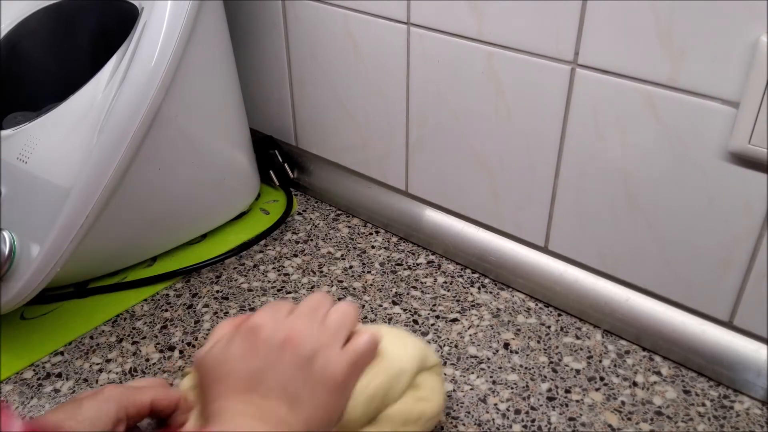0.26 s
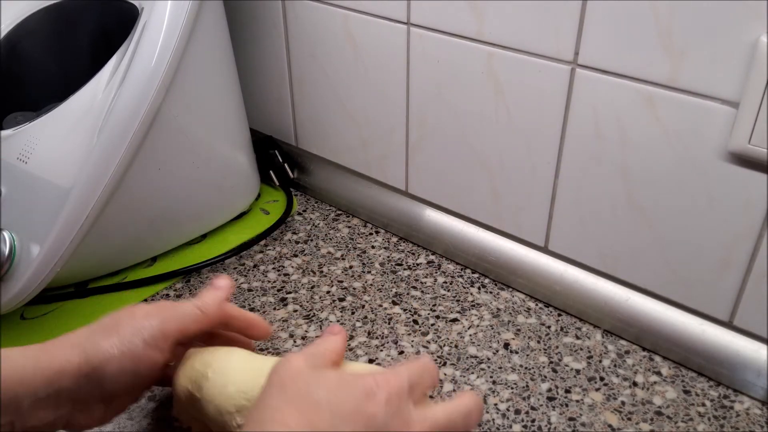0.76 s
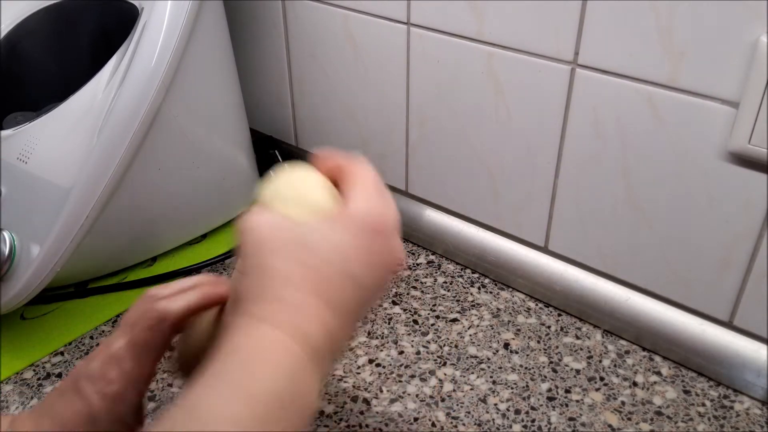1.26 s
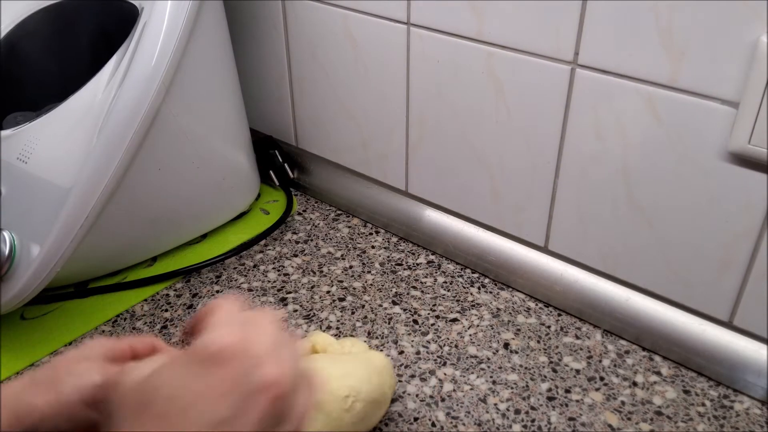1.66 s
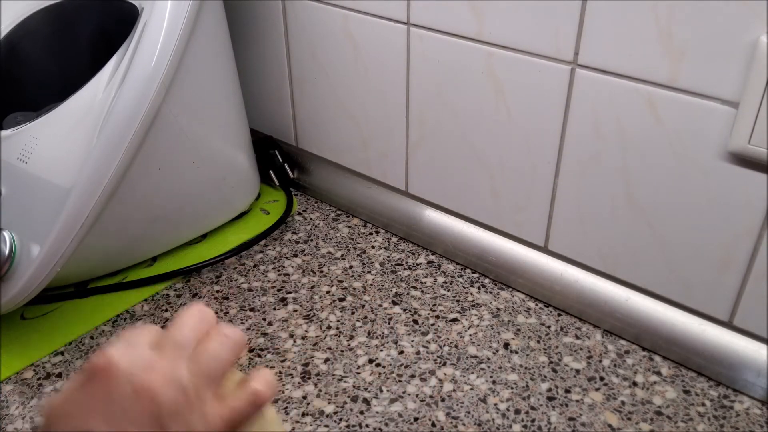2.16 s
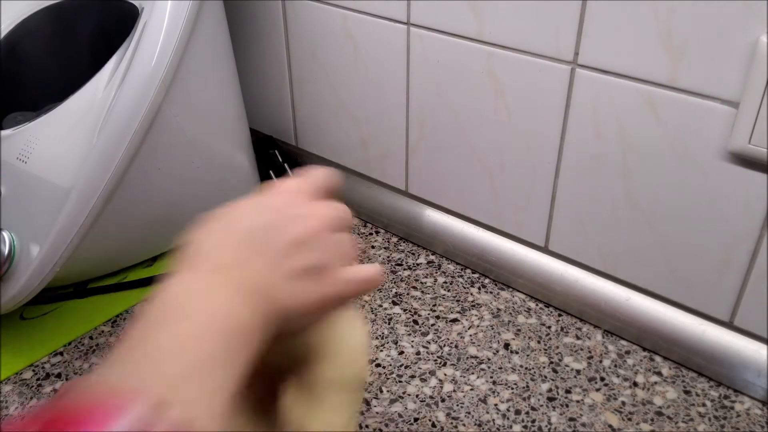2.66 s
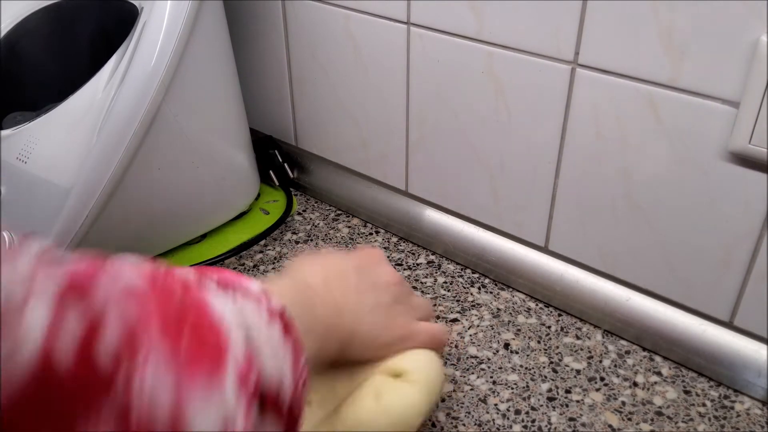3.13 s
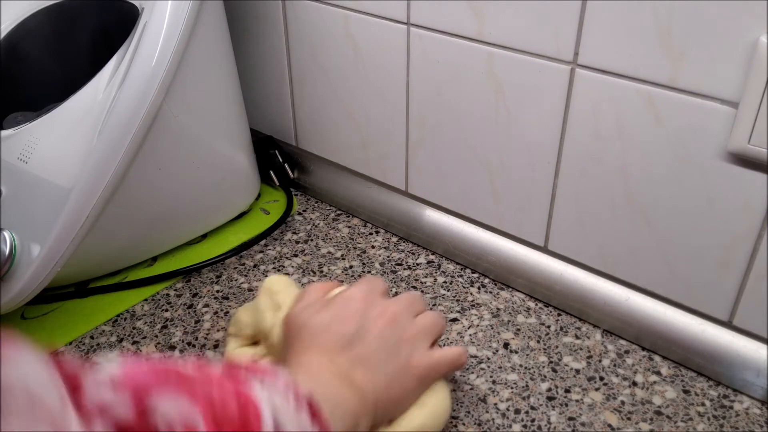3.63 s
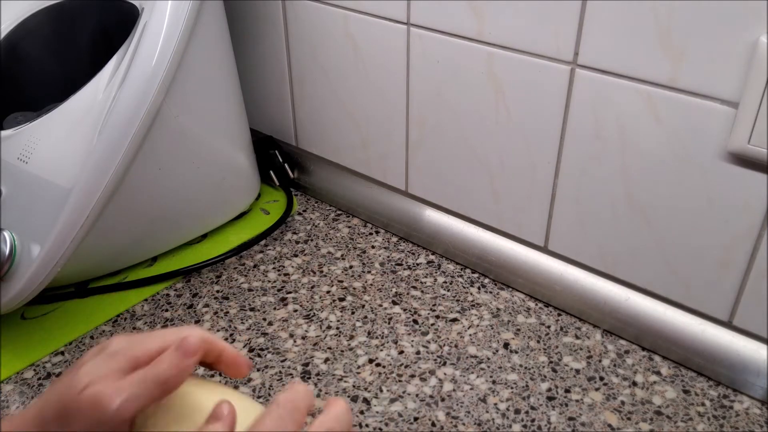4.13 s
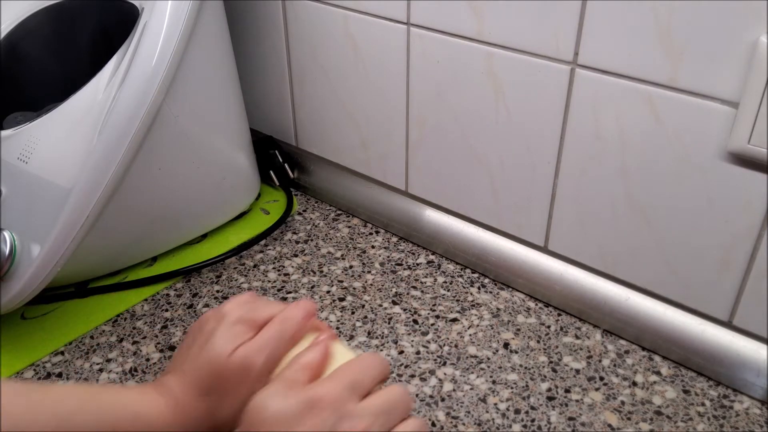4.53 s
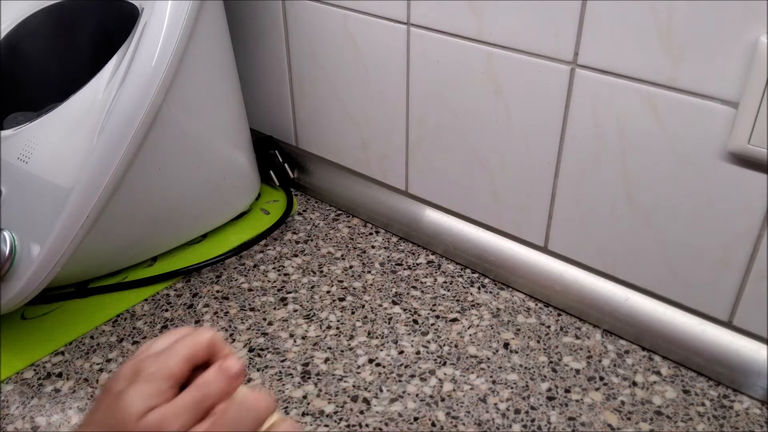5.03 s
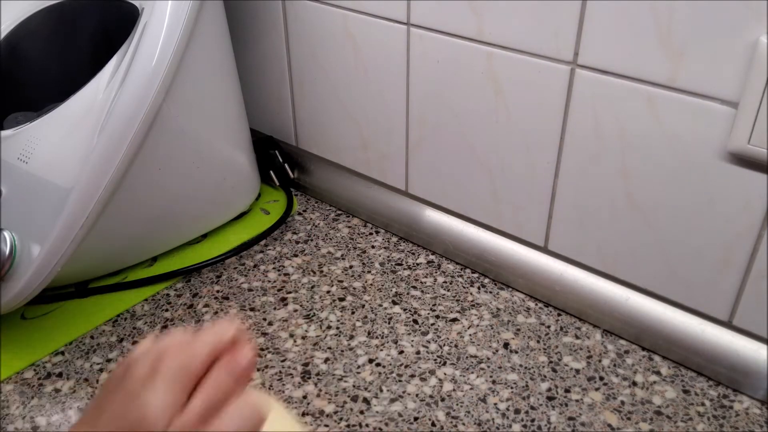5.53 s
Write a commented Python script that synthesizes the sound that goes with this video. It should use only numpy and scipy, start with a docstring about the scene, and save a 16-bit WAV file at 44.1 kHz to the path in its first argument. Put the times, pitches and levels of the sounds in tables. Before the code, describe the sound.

Hands knead a lump of soft dough on a hollow kitchen countertop, making dull, uneven thuds with a faint hiss of rubbing skin. About a second and a half in, the dough is slammed down with a loud slap and a low boom. Softer pushes follow, with small sticky ticks and a lighter smack at the end. The microphone is close, and the tiled room rings briefly.

```python
"""A hollow kitchen worktop booms on its low modes as hands knead soft dough on it.
Each push is a force pulse that excites the modes; dragging dough keeps them and an air pocket ringing.
Once the lump is slammed down with a slap and a crack. Friction of skin and dough adds a soft hiss.
The tiled room rings briefly over a faint room tone, and a pair of small microphones listens close by."""
import sys
import numpy as np
from scipy import signal
from scipy.fft import rfft, irfft, next_fast_len
from scipy.io import wavfile
from scipy.ndimage import uniform_filter1d

SR = 44100
rng = np.random.default_rng(int(sys.argv[2]) if len(sys.argv) > 2 else 0)


def bounce(signal):
    """Save signal as a 16-bit WAV file at the path given by the first command-line argument."""
    frames = np.transpose(np.atleast_2d(signal))
    limited = np.clip(frames, -1, 1)
    pcm = np.round(limited * 32767).astype(np.int16)
    wavfile.write(sys.argv[1], SR, pcm)


N = 255339

# worktop modes in three groups: (f/Hz, relative level/dB, free t60/s, build-up/ms)
DEEP_MODES = [(72.45, 2.5, 0.2, 12.8), (45.5, -10, 0.49, 40.2)]
PANEL_MODES = [(132.35, 5, 0.21, 2.66), (111.3, -10.5, 0.29, 2.36), (173, -17, 0.36, 2.3)]
UPPER_MODES = [(294.6, -8, 0.37, 3.1), (370.6, 3.5, 0.12, 2.1), (429, 9.5, 0.07, 2.6),
               (588, -0.5, 0.12, 1.8), (639, -11, 0.42, 4.1), (717, 6, 0.085, 0.6), (860, 6.5, 0.074, 4.3),
               (236.7, -8.5, 0.093, 1.8), (343, -13.5, 0.468, 2.54), (501.3, -13.5, 0.25, 7.6),
               (956, -12, 0.323, 1.6)]
# the deep modes lead by a quarter cycle
MODE_GROUPS = (DEEP_MODES, np.cos), (PANEL_MODES, np.sin), (UPPER_MODES, np.sin)
# pushes on the worktop: (t/s, level/dB, panel offset/dB, upper offset/dB, share of the free t60)
PUSH_PULSES = [(.018, -46, 2.5, -37, 0.74), (.088, -39, -1, -22, 0.74), (0.182, -53, -9, -25, .6),
               (0.218, -48, -0.5, -6.5, 0.28), (.264, -51, 14, -33, .34), (0.408, -54, 6.5, -22, 0.97),
               (0.48, -41.5, 0, -19, 1), (0.531, -32.5, -8.5, -20.5, 0.54), (0.574, -49, -7, -6, 0.4),
               (0.681, -49.5, 5.5, -36, .65), (0.86, -64, 0, -22, 0.42), (0.991, -37, -3, -21, 0.49),
               (1.16, -43.5, -3, -21, 1), (1.2, -38.5, -6.5, -23, 0.56), (1.5421, -33, 3, -1.5, .3),
               (1.547, -5.5, -8.5, -20.5, 0.75), (1.659, -31.5, -3, -7.5, 0.64),
               (1.7, -40, 2.5, -24.5, 0.74), (1.881, -31, 7, -2.5, 0.42), (1.907, -27, 6, -21, 0.63),
               (2.014, -46.5, 7.5, -38, 0.93), (2.24, -42, -12.5, -29, 0.56), (2.299, -50.5, -3, -9, 0.46),
               (2.389, -62.5, 10, -0.5, .97), (2.6, -46, -6.5, -34, 1), (2.696, -46, 1, -22, 1),
               (2.857, -33.5, -12, -27, 0.65), (2.903, -29, -26, -42, 0.47), (2.989, -60, -10, -27, 0.57),
               (3.102, -44, 6, -12, 0.92), (3.134, -39.5, 0, -17, 0.92), (3.173, -38, -7, -38, 0.48),
               (3.389, -47.5, -7, 5.5, 0.24), (3.491, -36.5, -8.5, -22, 0.95), (3.592, -42, 5.5, -44, 0.37),
               (3.619, -40, 0, -28, 0.69), (3.658, -39, -18, -39, 0.59), (3.714, -30, -7.5, -32, .58),
               (3.821, -47, 0, -15, 0.58), (4.249, -46.5, -19, -54, 1), (4.646, -40, -6, -45, 1),
               (4.82, -53, 7.5, -10, 0.6), (4.924, -54, -6, -22, 1), (5.052, -25, -9.5, -62, 0.77),
               (5.157, -47, 5.5, 0.5, 1), (5.196, -43, -2, -10, 0.53), (5.239, -40, 3.5, -17, 0.83),
               (5.267, -36, -5.5, -33, 0.81), (5.463, -40.5, 10, -13, 0.97), (5.571, -40, -5, -16, 0.47),
               (5.689, -22, -27, -46, 0.82), (5.731, -37, -10, -15.5, 0.45)]
CONTACT_MS, HARDEN_MS_PER_DB = 2.11, 0.1344  # contact time at 0 dB; softer pushes last longer


def pushes():
    """Impact excitation: a smooth force pulse rings the worktop's modes, which the resting hand damps."""
    out = np.zeros((2, N))
    contact_shares = 1, 1, .3  # the upper modes feel only the first contact
    for start, db, panel_db, upper_db, t60_share in PUSH_PULSES:
        contact_ms = CONTACT_MS - HARDEN_MS_PER_DB * db
        for (modes, wave), offset_db, share in zip(MODE_GROUPS, (0, panel_db, upper_db), contact_shares):
            pulse = np.hanning(max(round(share * contact_ms * SR / 1000), 3) + 2)
            response = modal_response(modes, t60_share, place=0.233, wave=wave)
            add(out, start, gain_of(db + offset_db) * signal.oaconvolve(response, pulse / pulse.sum()))
    return out


def modal_response(modes, t60_share, place, wave):
    """Modal superposition: damped sinusoids, weighted by mode shape at a place (0-1) along the board."""
    t = np.arange(SR // 3) / SR
    response = np.zeros_like(t)
    for k, (hz, db, t60, build_ms) in enumerate(modes):
        envelope = gain_of(db - 60 * t / (t60 * t60_share)) * (1 - np.exp(-1000 * t / build_ms))
        response += np.cos(np.pi * k * place) * envelope * wave(2 * np.pi * hz * t)
    return response


# steady kneading pressure: (t/s, level/dB)
KNEAD_PRESSURE = [(0.0, -56.5), (0.82, -70), (1.14, -60), (1.47, -86), (1.63, -43), (1.77, -54.5),
                  (2.23, -76), (2.55, -67.5), (2.85, -66.5), (3.45, -61.5), (3.69, -50), (3.85, -66),
                  (4.24, -76), (4.69, -63.5), (4.81, -59.5), (5.14, -51.5), (5.4, -64), (5.79, -63)]
# dough dragging on the board: (t/s, duration/s, upper-mode level/dB, air-pocket level/dB)
DOUGH_DRAGS = [(0.05, 0.071, -72, -67), (0.208, .05, -69, -64), (0.428, .18, -67, -63),
               (0.806, 0.062, -75, -71.5), (1.338, .1, -78, -78), (1.559, 0.13, -49.5, -47),
               (1.885, 0.1, -51, -49), (2.356, 0.093, -74.5, -66), (2.577, 0.22, -72, -73),
               (2.846, 0.058, -70, -63), (3.083, 0.14, -68, -60.5), (3.235, 0.12, -75.5, -68.5),
               (3.774, 0.39, -73.5, -72), (4.44, 0.14, -70.5, -74.5), (4.782, .14, -71.5, -73),
               (5.193, 0.1, -62.5, -69.5), (5.444, 0.19, -63.5, -68)]
KNEAD_DB, SLIP_DB, STEREO_SPREAD = (-6, -6.5, -25), (-25, -30.5, -39), (.25, .1, .7)  # deep, panel, upper
SLIP_T60_S = 0.34  # after each push the dough keeps slipping for a while


def kneading():
    """Stick-slip excitation: dough moves in small jerks that drive the worktop and the air pocket."""
    out, blows, t = np.zeros((2, N)), np.zeros(N), np.arange(N) / SR
    for start, db, *_ in PUSH_PULSES:
        add(blows, start, gain_of([db]))
    slipping = signal.lfilter([1], [1, -gain_of(-60 / (SLIP_T60_S * SR))], blows)
    pressure = gain_of(curves(KNEAD_PRESSURE)[0])
    upper_drag, pocket_drag = sum(gain_of(levels)[:, None] * stroke(t - start, duration)
                                  for start, duration, *levels in DOUGH_DRAGS)
    drives = zip(MODE_GROUPS, KNEAD_DB, SLIP_DB, STEREO_SPREAD, (0, 0, upper_drag))
    for (modes, wave), knead_db, slip_db, spread, drag in drives:
        response = modal_response(modes, t60_share=0.33, place=0.89, wave=wave)
        mid, side = jerks(per_second=300)
        grains = unit_rms(np.array([mid + spread * side, mid - spread * side]))
        force = gain_of(knead_db) * pressure + gain_of(slip_db) * slipping + drag
        out += resonate(force * grains, response)
    return out + squishes(pocket_drag)


# air pocket under the palm: (f/Hz, relative level/dB, t60/s, build-up/ms)
POCKET_MODES = [(397.3, 1, 0.082, 2.6), (434.6, -4.5, 0.06, 2.6)]


def squishes(drag):
    """Cavity resonance: the air pocket under the palm rings softly while the dough drags."""
    response = modal_response(POCKET_MODES, t60_share=1, place=0, wave=np.sin)
    mid, side = jerks(per_second=250)
    grains = unit_rms(np.array([mid + .6 * side, mid - 0.67 * side]))
    return resonate(drag * grains, response)


# slaps and sticky ticks of skin on dough: (t/s, level/dB, centre f/Hz, roll-off/(dB per octave), t60/s)
SLAP_BURSTS = [(.2937, -62, 8000, 19, .022), (0.386, -59, 7900, 25, .047), (.779, -47, 12600, 16, 0.0075),
               (.986, -64, 990, 22, 0.12), (1.1862, -62.5, 1920, 9, 0.06), (1.5445, -31, 900, 8.5, .03),
               (1.5478, -20, 2600, 3, 0.03), (1.8779, -51, 960, .5, .042), (1.8839, -46, 940, 1, 0.06),
               (1.9109, -51, 925, 5.5, 0.13), (2.011, -52, 1490, 5.5, 0.05), (2.486, -67, 1570, 19, 0.034),
               (2.8593, -55.5, 1120, 7, 0.046), (3.039, -62.5, 1970, 15, 0.021),
               (3.1811, -36, 6600, 11, 0.033), (3.3891, -43, 2780, 3, 0.043),
               (3.5912, -59.5, 950, 9, 0.035), (3.7614, -52.5, 865, 9, 0.01), (3.831, -54, 8480, -1, 0.042),
               (4.799, -60, 1690, 5.5, 0.14), (5.0532, -60, 2070, 6, .03), (5.1258, -56, 1030, 18, .043),
               (5.1503, -41.5, 920, 19.5, 0.031), (5.467, -57, 1490, 25, .038),
               (5.7683, -33.5, 2060, 6, 0.03)]
SLAP_RISE_MS = 0.85


def slaps():
    """Impact noise: a burst shaped by one broad resonance grows and decays exponentially."""
    out, hz = np.zeros((2, N)), np.fft.rfftfreq(4000, 1 / SR) + 30
    lead_s = .01
    t = np.arange(4000) / SR - lead_s
    for start, db, centre_hz, rolloff_db, t60 in SLAP_BURSTS:
        rise = np.exp(1000 * np.minimum(t, 0) / SLAP_RISE_MS)
        envelope = np.where(t < 0, rise, gain_of(-60 * t / t60))
        colour_db = -rolloff_db * abs(np.log2(hz / centre_hz))
        add(out, start - lead_s, gain_of(db) * envelope * burst(colour_db, pan_db=1.5))
    return out


# quick brushes of skin on dough, and the sharp crack of the lump slammed down:
# (t/s, duration/s, level/dB, lower f/Hz, upper f/Hz)
BRUSHES_AND_CRACK = [(.01, 0.11, -64.5, 1230, 15000), (0.381, 0.044, -62.5, 6030, 15100),
                     (0.457, .15, -61.5, 1740, 15100), (0.814, 0.069, -73, 503, 870),
                     (0.984, .13, -71, 3000, 15000), (1.144, .095, -64.5, 2900, 15000),
                     (1.548, 0.0087, -28, 2000, 4200), (1.877, 0.049, -39, 172, 220),
                     (1.943, 0.14, -60, 1490, 12000), (2.226, 0.1, -60, 8200, 14800),
                     (2.586, 0.18, -59, 1100, 14600), (2.72, .11, -63.5, 1100, 14800),
                     (2.859, 0.066, -59, 8000, 15000), (3.136, 0.15, -58, 1760, 8850),
                     (3.54, 0.24, -64.5, 3280, 15000), (3.796, 0.081, -62, 2480, 15000),
                     (3.949, .2, -72.5, 1400, 1990), (4.211, 0.13, -69, 2440, 15100),
                     (4.422, 0.2, -51.5, 4470, 14900), (4.442, 0.17, -68.5, 700, 2490),
                     (4.621, 0.15, -63.5, 3970, 15100), (4.775, 0.097, -59.5, 1990, 15000),
                     (5.119, 0.15, -64, 700, 1500), (5.125, .14, -59.5, 2920, 15000),
                     (5.244, 0.047, -61, 3000, 15000), (5.392, 0.062, -60.5, 1000, 15000),
                     (5.45, 0.12, -65, 500, 2530), (5.538, 0.067, -69, 1000, 15000),
                     (5.503, .051, -59.5, 3000, 14800), (5.665, 0.16, -51, 4600, 14800)]


def brushes_and_crack():
    """Band-limited noise: stick-slip hiss of brushing skin, and one very short burst for the slam."""
    size = 12000
    out, t, hz = np.zeros((2, N)), np.arange(size) / SR, np.fft.rfftfreq(size, 1 / SR) + 30
    for start, duration, db, low_hz, high_hz in BRUSHES_AND_CRACK:
        flicker_db = 1.5 * unit_rms(uniform_filter1d(rng.standard_normal(size), size=150))
        octaves_outside = np.maximum(np.log2(low_hz / hz), 0) + np.maximum(np.log2(hz / high_hz), 0)
        band = burst(-14 * octaves_outside, pan_db=0.3)
        add(out, start, gain_of(db + flicker_db) * stroke(t, duration) * band)
    return out


# sliding over the surface: (t/s, hiss level/dB, scuff level relative to hiss/dB)
SLIDE_LEVELS = [(0.0, -63, -1), (0.27, -64.5, -7), (0.44, -67, -2.5), (0.61, -63.5, -6), (0.79, -72, -9.5),
                (1.08, -72, 0.5), (1.35, -78, -1), (1.6, -88, -7), (1.77, -73, -11), (1.84, -71.5, -6),
                (2.0, -71.5, -4), (2.42, -70, -4.5), (2.66, -70.5, -5.5), (2.8, -66, -4.5),
                (2.93, -66.5, -3), (3.71, -65, -4.5), (3.92, -64.5, -3.5), (4.06, -74.5, 0), (4.31, -76, 1),
                (4.48, -70, -3), (4.61, -66.5, -5.5), (4.66, -64, -3), (4.82, -68, 1), (5.1, -66.5, -4.5),
                (5.32, -61, -5.5), (5.79, -70.5, 2.5)]
# friction spectra: (f/Hz, relative spectral level/dB)
HISS_SPECTRUM = [(1470, -15.5), (2500, -3), (2900, -7.5), (3150, -6.5), (4070, -4), (4640, -1), (8050, -5),
                 (15900, -5)]
SCUFF_SPECTRUM = [(500, 6), (900, 3), (2000, -8), (4000, -2.5), (7000, -29.5)]


def sliding():
    """Sliding friction: changing grip and tiny sticky ticks modulate a fine hiss and a duller scuff."""
    hiss_db, scuff_db = curves(SLIDE_LEVELS)
    grip_db = 1.5 * unit_rms(uniform_filter1d(rng.standard_normal(N), size=500))
    ticks = gain_of(3.5 * np.minimum(rng.exponential(1, N), 3)) * (rng.random(N) < 40 / SR)
    sticky = 1 + .5 * signal.lfilter([1], [1, -np.exp(-1 / (0.00054 * SR))], ticks)
    hiss = noise(HISS_SPECTRUM, patchy_db=0.51, lag_s=0.00042)
    scuff = gain_of(scuff_db) * noise(SCUFF_SPECTRUM, patchy_db=0.72, lag_s=0.000082)
    return (hiss + scuff) * sticky * gain_of(hiss_db + grip_db) * pan(db=2)


# reverberation time of the tiled room: (f/Hz, t60/s)
ROOM_T60 = [(100, 0.73), (260, 0.35), (700, 0.54), (1840, 0.5), (4850, 0.51), (12800, 0.25)]


def room(sound):
    """Reverberation: sparse reflections of random sign decay exponentially, each band at its own rate."""
    taps = np.zeros((2, SR))
    arrivals = np.arange(160, SR - 20, 10) + rng.integers(0, 10, (2, (SR - 171) // 10))
    np.put_along_axis(taps, arrivals, rng.choice([-1., 1.], arrivals.shape), 1)
    hz, t, bands = signal.stft(taps, SR, nperseg=256)
    tail = signal.istft(bands * gain_of(-60 * t / read(ROOM_T60, hz)[:, None]), SR, nperseg=256)[1]
    # the booms travel through the worktop, not the air
    tail = signal.lfilter(*signal.butter(4, 240, "high", fs=SR), tail)
    return signal.fftconvolve(sound, tail / np.linalg.norm(tail[0]), axes=1)[:, :N]


# kitchen and microphone noise: (f/Hz, relative spectral level/dB)
AIR_SPECTRUM = [(18, -40), (30, -7.5), (59, 7.5), (130, -10), (239, -51), (383, -6), (582, -12),
                (1250, -24), (2470, -27.5), (2810, -21.5), (4170, -36.5), (5860, -16), (9660, -25),
                (13200, -20.5), (15900, -62.5)]
# faint appliance tones: (f/Hz, half-width/Hz, level/dB)
APPLIANCE_TONES = [(577.6, 32, -79.5), (2510, 20, -87.5), (3302, 82, -85)]


def room_tone():
    """Ambient noise: a broadband floor, and narrow noise bands heard as wavering appliance tones."""
    air = gain_of(-70.5) * noise(AIR_SPECTRUM, patchy_db=1.5, lag_s=0, size=2048)
    hz = np.fft.rfftfreq(N, 1 / SR)
    white = rfft(rng.standard_normal((2, N)))
    return air + sum(gain_of(db) * unit_rms(irfft(white * np.exp(-((hz - centre) / width) ** 2), N))
                     for centre, width, db in APPLIANCE_TONES)


# likeness of the noise at the two microphones: (f/Hz, correlation coefficient)
COHERENCE = [(60, 1), (300, 0.68), (700, 0.88), (2000, 0.17), (15000, 0.08)]


def noise(spectrum, patchy_db, lag_s, size=512):
    """Partial coherence: stereo noise with drifting patches; its shared part lags on the right."""
    frames, hz = 4 * N // size + 5, np.fft.rfftfreq(size, 1 / SR)
    a, b, c, d, patches = rng.standard_normal((frames, len(hz), 5)).T
    patches = unit_rms(uniform_filter1d(uniform_filter1d(patches, size=8, axis=0), size=20, axis=1))
    coherence = read(COHERENCE, hz)[:, None]
    delay = np.exp(-2j * np.pi * hz * lag_s)[:, None]
    left = a + 1j * b
    right = coherence * delay * left + np.sqrt(1 - coherence ** 2) * (c + 1j * d)
    bands = np.array([left, right]) * gain_of(read(spectrum, hz)[:, None] + patchy_db * patches)
    return unit_rms(signal.istft(bands, nperseg=size, noverlap=3 * size // 4)[1][:, :N])


def burst(colour_db, pan_db):
    """Spectral shaping: coloured stereo noise; a trace of the left channel reaches the right late."""
    left, independent = rng.standard_normal((2, 2 * len(colour_db) - 2))
    right = 0.083 * np.roll(left, shift=9) + 1.08 * independent
    return unit_rms(irfft(rfft([left, right]) * gain_of(colour_db))) * pan(pan_db)


def jerks(per_second):
    """Poisson process: two independent trains of impulses of random strength."""
    return rng.standard_normal((2, N)) * (rng.random((2, N)) < per_second / SR)


def resonate(force, response):
    """Forced vibration: the force convolved with an impulse response of unit energy."""
    return signal.oaconvolve(force, response[None] / np.linalg.norm(response))[:, :N]


def stroke(t, duration):
    """Trapezoidal envelope: quick rise, hold, slower fall."""
    return np.clip(t / (0.2 * duration), 0, 1) * np.clip((duration - t) / (0.47 * duration), 0, 1)


def pan(db):
    """Level difference: channel gains with the left louder by db."""
    return gain_of(np.array([[.5], [-.5]]) * db)


def gain_of(db):
    """Level to amplitude ratio."""
    return 10 ** (np.asarray(db) / 20)


def unit_rms(x):
    """Normalisation to rms 1."""
    return x / np.sqrt(np.mean(x ** 2) + 1e-20)


def read(points, hz):
    """Interpolation on a log-frequency axis."""
    f, value = np.transpose(points)
    return np.interp(np.log(hz + 1), np.log(f + 1), value)


def curves(rows):
    """Linear interpolation of each column over time."""
    times, *columns = np.transpose(rows)
    return [np.interp(np.arange(N) / SR, times, column) for column in columns]


def add(mix, start_s, sound):
    """Superposition of a sound from a start time on."""
    part = mix[..., round(start_s * SR):][..., :sound.shape[-1]]
    part += sound[..., :part.shape[-1]]


def scene():
    """Superposition: direct sound, its reverberation off the tiles, sliding hiss and room tone."""
    direct = slaps() + brushes_and_crack() + pushes() + kneading()
    return direct + gain_of(-8) * room(direct) + sliding() + room_tone()


# response common to both microphones: (f/Hz, level/dB)
MIC_RESPONSE = [(800, 1.99), (1200, 3), (1600, 5.5), (2100, 5.5), (2500, 2.5), (3200, 2.5), (4300, -1),
                (5700, 0), (7500, -0.1), (12000, 0.04)]
# difference between their ports: (f/Hz, left minus right level/dB)
PORT_BALANCE = [(130, -.3), (300, 1.2), (700, 1.5), (1300, -.6), (4400, -2.5), (8100, -2), (13000, 4)]
BAND_LIMIT_HZ = 15850


def record(dry):
    """Linear filtering: port colouring, the small capsules' loss of deep bass, then a band limit."""
    size = next_fast_len(N + 4096)
    hz = np.fft.rfftfreq(size, 1 / SR)
    response = gain_of(read(MIC_RESPONSE, hz)) * pan(read(PORT_BALANCE, hz))
    coloured = irfft(rfft(dry, size) * response, size)[:, :N]
    thinned = signal.sosfilt(signal.butter(2, 33, "high", fs=SR, output="sos"), coloured)
    lowpass = signal.firwin(511, BAND_LIMIT_HZ, window=("kaiser", 9), fs=SR)
    return signal.oaconvolve(thinned, lowpass[None], "same")


dry = scene()
out = record(dry)
bounce(out)
```